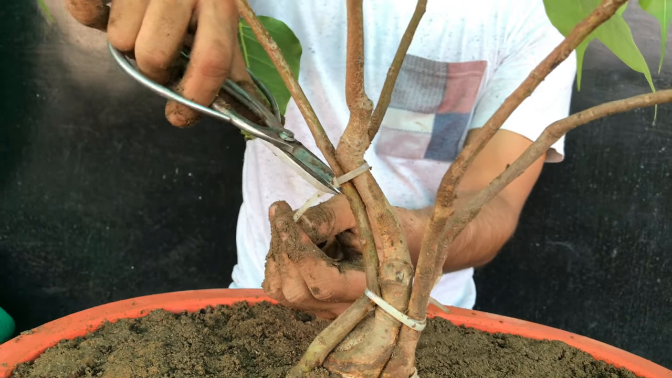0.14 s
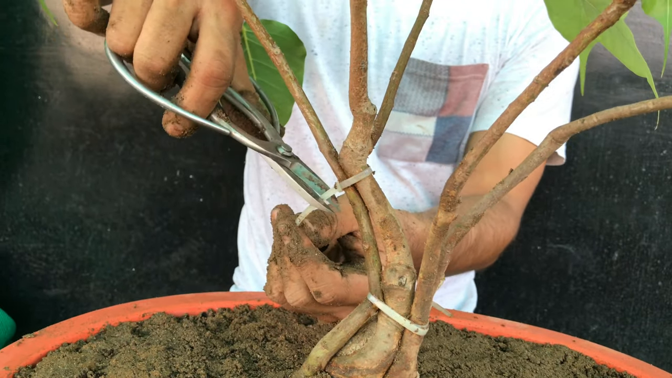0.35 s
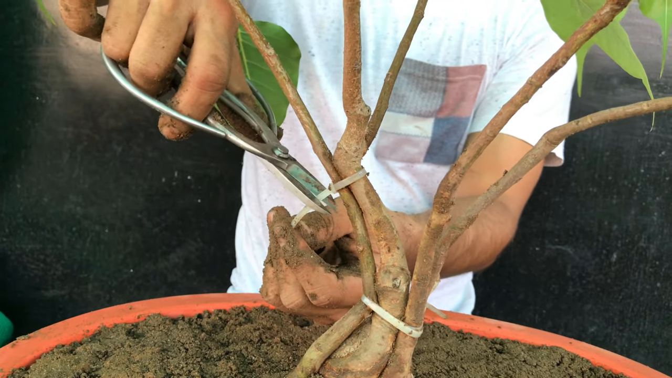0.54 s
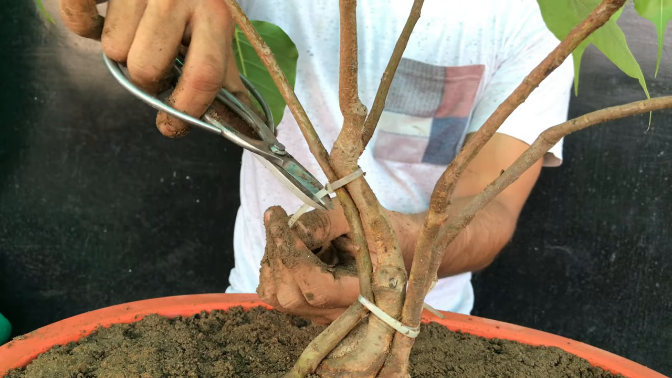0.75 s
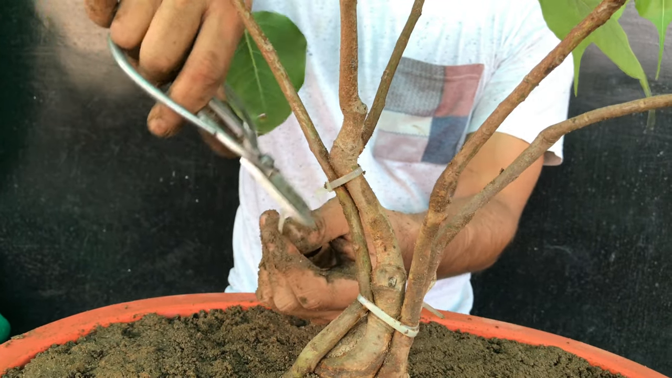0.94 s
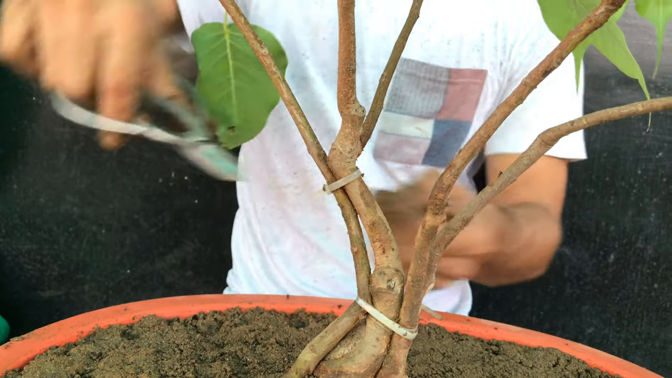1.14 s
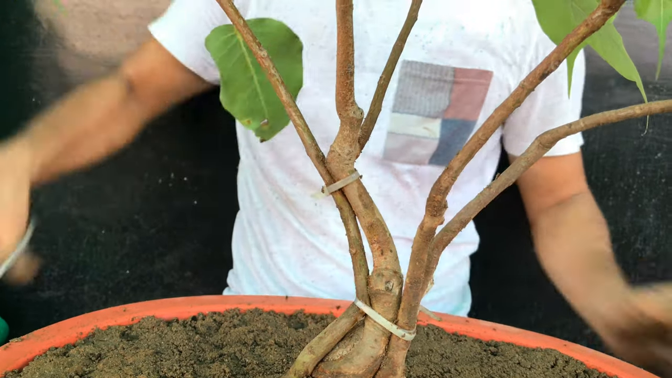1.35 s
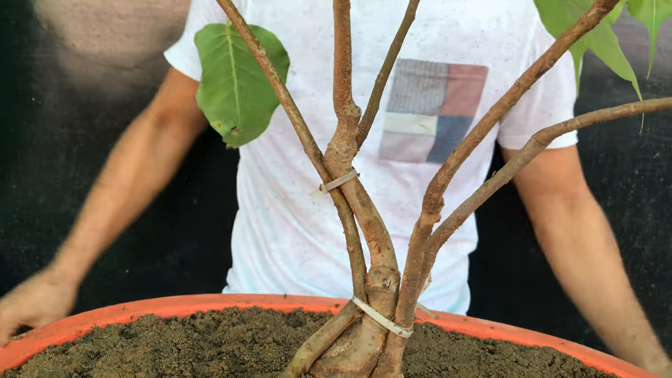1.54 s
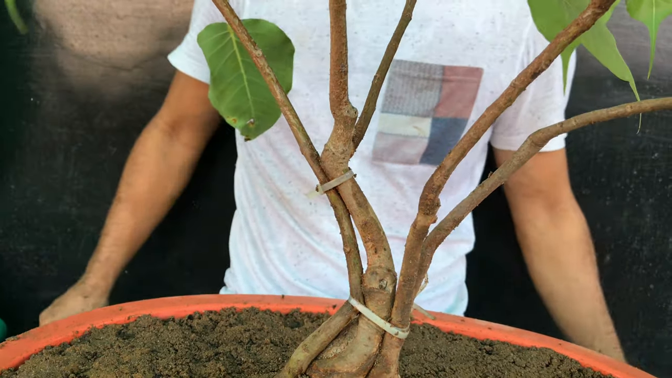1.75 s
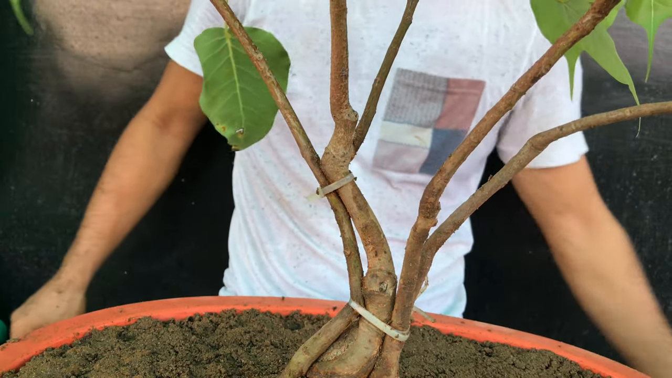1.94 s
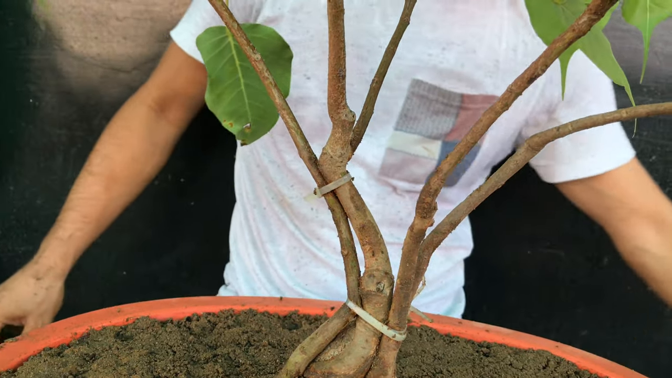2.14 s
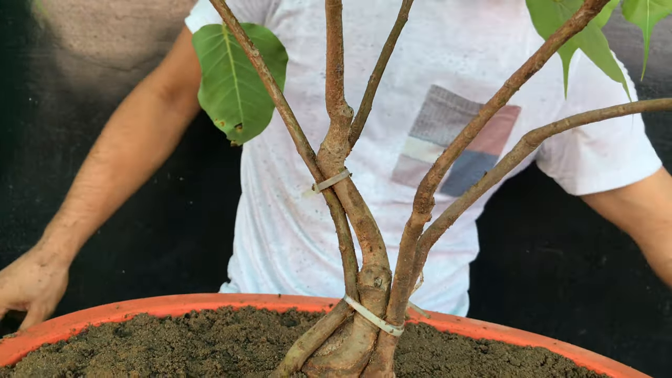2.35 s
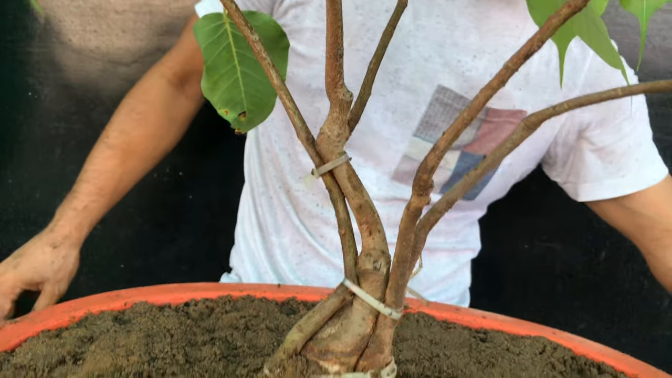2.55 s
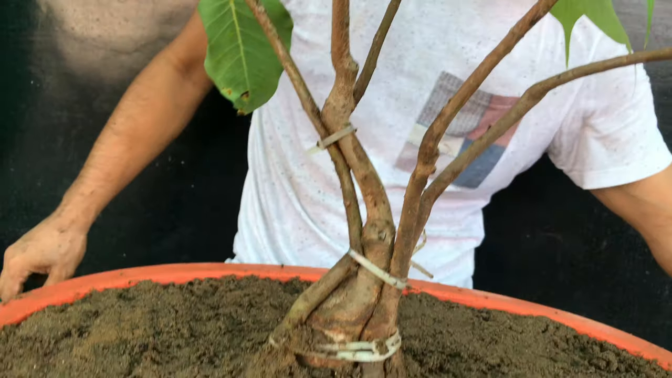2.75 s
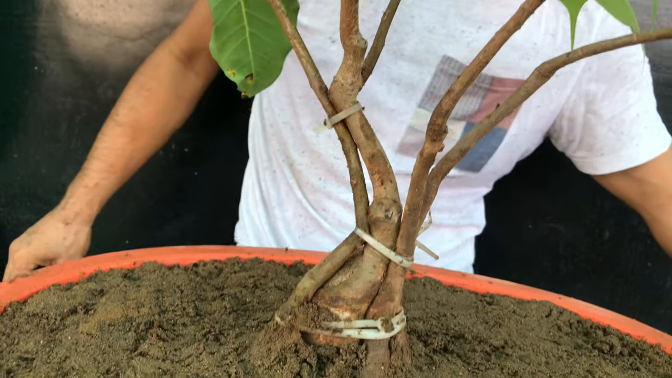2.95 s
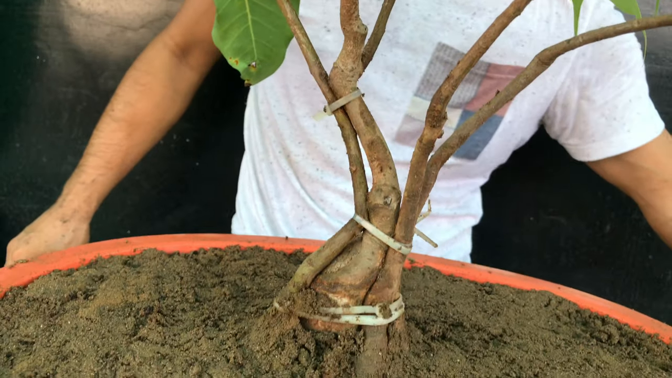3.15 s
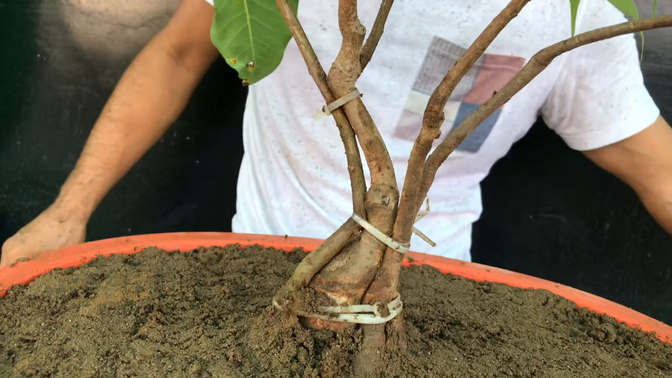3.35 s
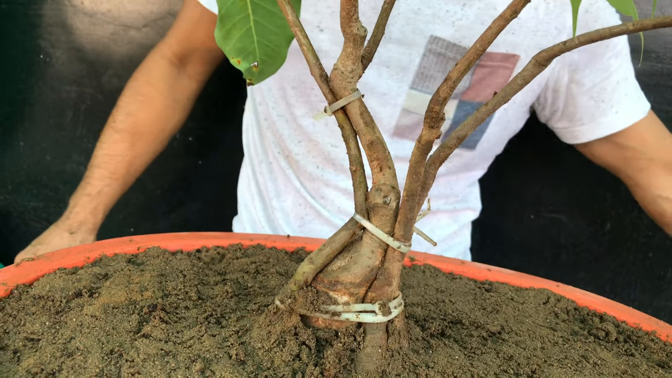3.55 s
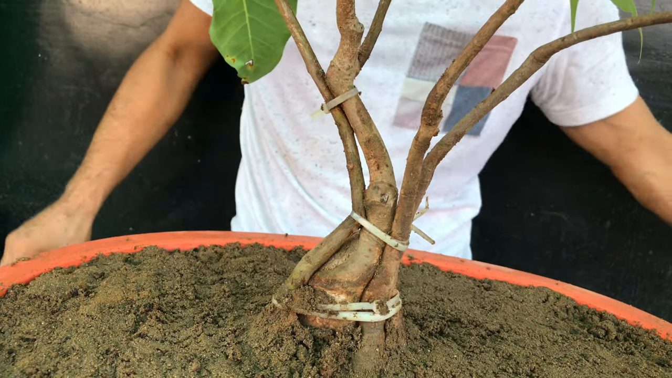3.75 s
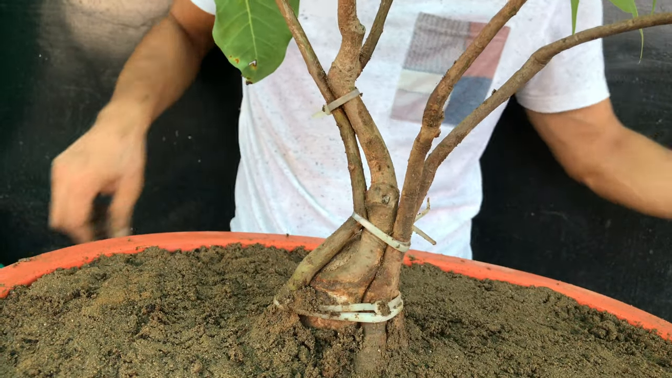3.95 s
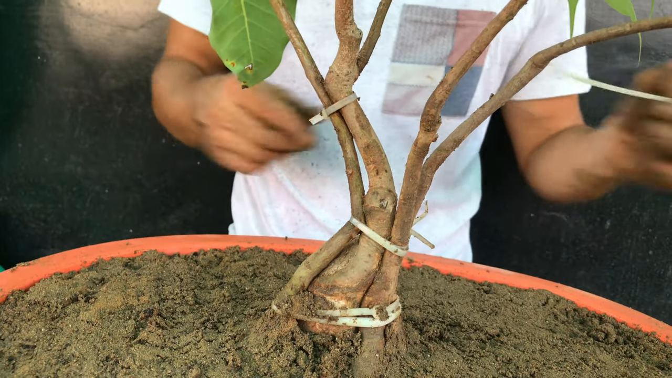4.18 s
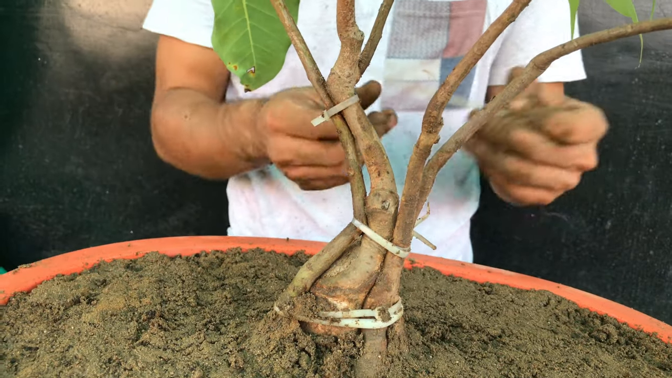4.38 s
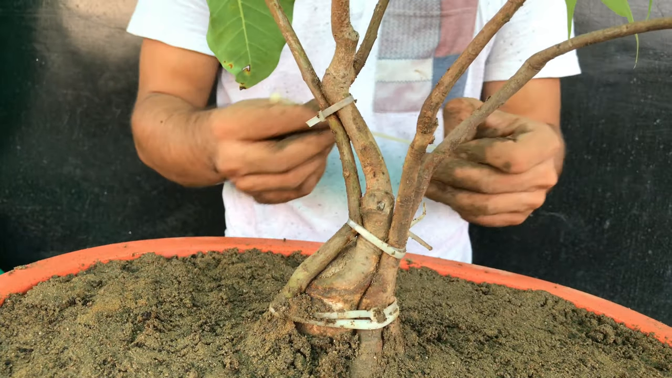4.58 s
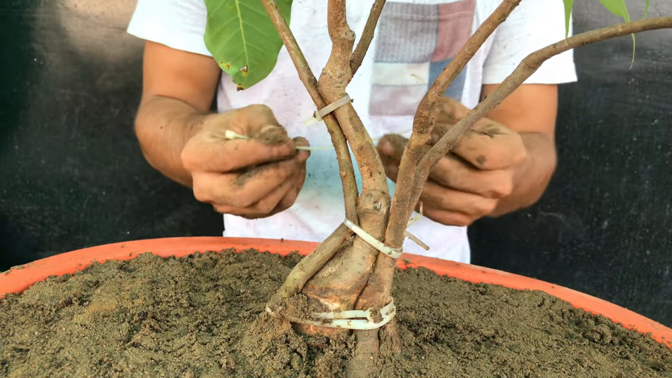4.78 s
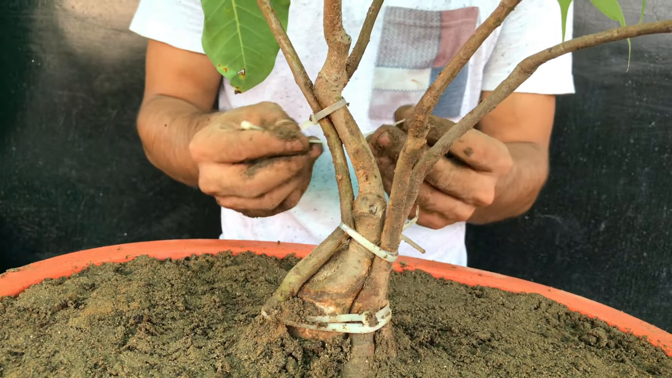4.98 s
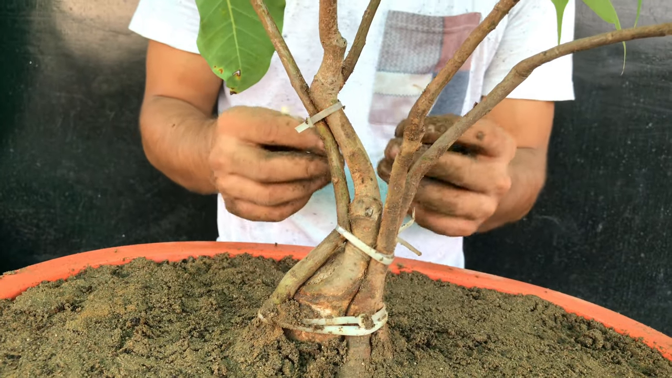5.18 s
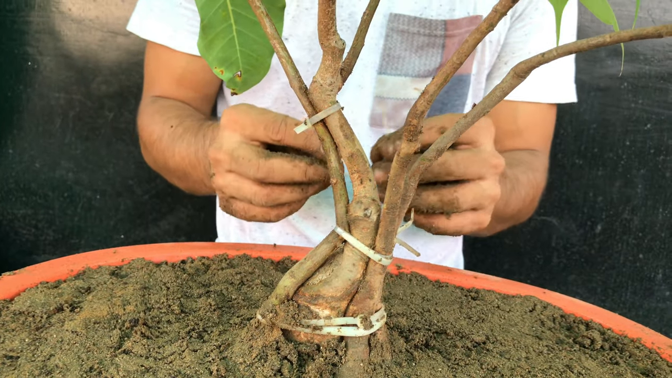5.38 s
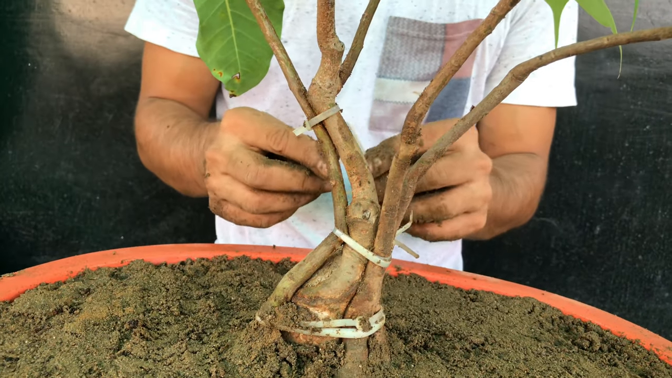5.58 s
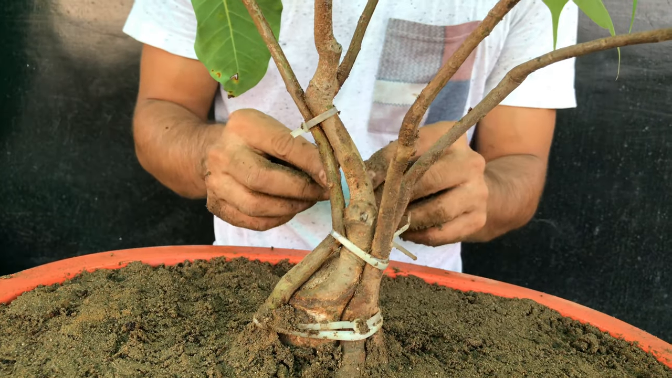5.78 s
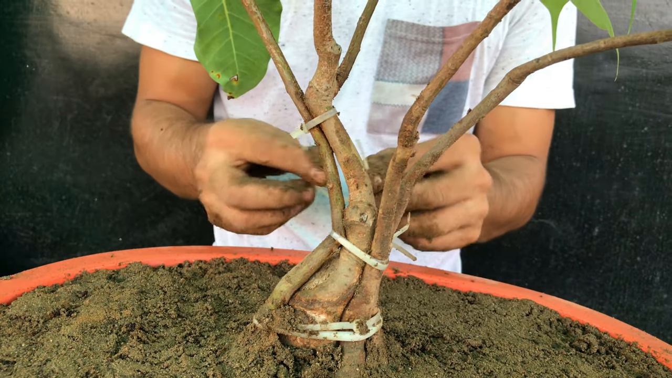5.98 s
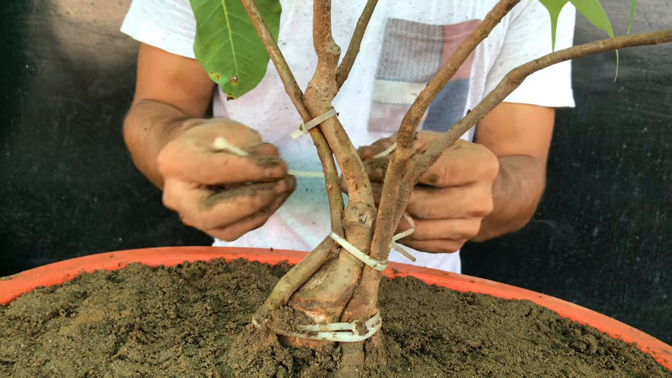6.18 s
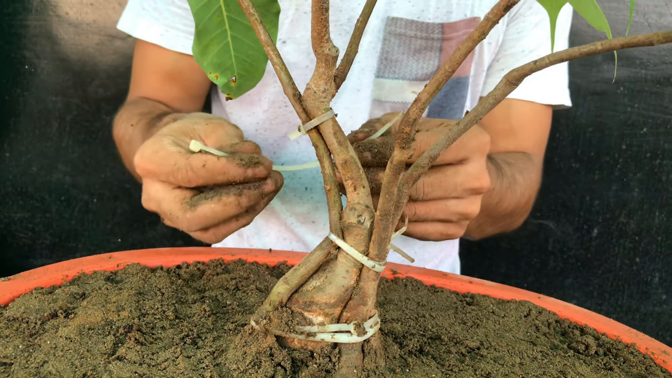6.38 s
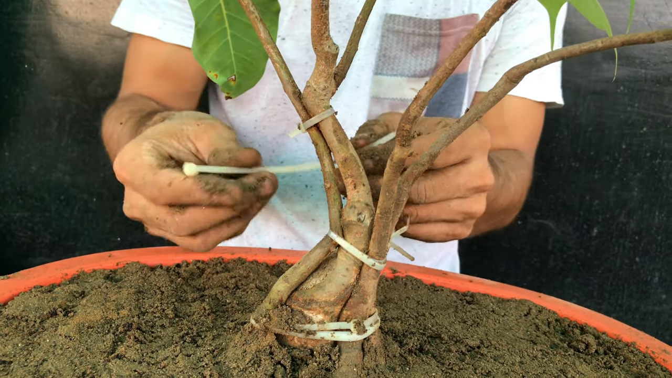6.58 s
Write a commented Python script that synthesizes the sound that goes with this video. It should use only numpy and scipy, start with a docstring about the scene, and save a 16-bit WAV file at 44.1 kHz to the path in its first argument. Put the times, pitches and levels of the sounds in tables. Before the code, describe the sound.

A quiet outdoor yard with constant low distant traffic, wavering engine hum and a barely audible high insect hiss. Faint brushes of cloth and hand come first. At about 0.87 s blades bite and creak, and at 0.89 s a very loud, dry plastic crack bursts out with bright steel ringing and a short tail. Tiny opening clicks follow near 1.1 s. From 1.74 to 1.87 s the scissors hit hard ground in a rapid, jingling clatter with dull thuds. Between 2.35 and 3.6 s a pot turns: irregular gritty ticks, scraping and fine soil grains, strongest near 2.7 s. A sharp click comes at 4.0 s, finger-sliding hiss at 4.45-4.8 s, and crisp ticks at 5.03 and 5.25 s. From 3.8 s onward small birds chirp, whistle and churr faintly, with blurred far horns and whines. Close, dry handling; distant, slightly echoing background.

```python
"""Small steel scissors snap through the tail of a cable tie on a potted tree outdoors, then drop on hard ground.
Coloured noise bursts make the cracks, bounces and thuds; blows on the steel also start decaying sine modes.
The pot turns with ringing gritty ticks and fine grains; fingers slide along a new tie as flickering hiss.
Far traffic is shaped noise under wavering engine tones; far horns, whines and insects are narrow noise or a sine.
Birds chirp, whistle and churr as gliding sines; further bird chatter is blurred into a noise band."""
import sys
import numpy as np
from scipy import signal
from scipy.fft import rfft, irfft
from scipy.io import wavfile
from scipy.ndimage import uniform_filter1d

SR = 44100
rng = np.random.default_rng(int(sys.argv[2]) if len(sys.argv) > 2 else 0)


def wav_record(signal):
    """Record a signal, one row per channel, as 16-bit PCM in the file named by sys.argv[1]."""
    frames = np.transpose(np.atleast_2d(signal))
    bounded = np.clip(frames, -1, 1)
    # unit amplitude maps onto the largest positive 16-bit level
    quanta = np.round(bounded * 32767).astype(np.int16)
    wavfile.write(sys.argv[1], SR, quanta)


N = 291942

# blade-opening clicks, then grit and plastic ticks, each with a faint scrape:
# t/s, ring peak/dB, centre f/Hz, treble peak/dB, scrape level/dB
TICKS = [(1.096, -46, 4000, -58, -80), (1.098, -49, 7000, -60, -85), (1.114, -52, 5400, -62, -85),
         (1.13, -53, 8800, -62, -85), (2.3612, -61, 7500, -60, -88), (2.4515, -56, 7500, -58, -76),
         (2.5094, -51, 5650, -56, -69), (2.591, -48, 7500, -63, -75), (2.6903, -41.5, 6500, -42, -69),
         (2.7197, -57, 6500, -47, -66), (2.744, -58, 9500, -51, -76), (2.8221, -47, 5400, -50, -69),
         (2.85, -58, 8000, -55, -85), (2.9025, -54, 5200, -55, -79), (2.9394, -52, 6000, -51, -79),
         (3.029, -46, 5300, -58, -81), (3.056, -62, 9000, -56, -84), (3.111, -56, 9500, -45, -68),
         (3.2494, -49, 4510, -54, -66), (3.2904, -49, 6960, -59, -74), (3.3493, -58, 9000, -52, -77),
         (3.4101, -53, 5000, -54, -69), (3.9905, -40.5, 4020, -41, -81), (3.998, -46, 3800, -49, -83),
         (4.4558, -54, 6500, -52, -80), (5.0338, -36, 4470, -44, -72), (5.255, -47, 6700, -44, -80)]
# spectrum of grit: f/Hz, relative level per Hz/dB
GRIT_SPECTRUM = [(7000, -18), (8500, -13), (11000, -10), (14000, -7), (15500, -6), (16500, -12)]


def undb(db):
    """Decibels to amplitude."""
    return 10 ** (np.asarray(db) / 20)


def unit(x):
    """Scale to rms 1."""
    return x / np.sqrt(np.mean(x ** 2))


def coloured(points):
    """Noise of rms 1 with the given spectrum, drawn straight in dB over log frequency."""
    hz, db = np.transpose(points)
    f = np.maximum(np.fft.rfftfreq(N, 1 / SR), 1)
    gain = undb(np.interp(np.log(f), np.log(hz), db))
    return unit(irfft(rfft(rng.standard_normal(N)) * gain, N))


def band(x, hz, width_hz):
    """A single resonance; fed with noise it leaves a soft-edged band."""
    b, a = signal.iirpeak(hz, hz / width_hz, fs=SR)
    return signal.lfilter(b, a, x)


def curve(rows):
    """Draw straight lines through a table of times and levels, one curve a column."""
    s, *columns = np.transpose(rows)
    return [np.interp(np.arange(N) / SR, s, column) for column in columns]


def walk(rate_hz):
    """Random levels held for 1 / rate and slewed twice; spread near 1."""
    hold = int(SR / rate_hz)
    steps = np.repeat(rng.standard_normal(N // hold + 1), hold)
    return 1.43 * uniform_filter1d(uniform_filter1d(steps, hold), hold)[:N]


def decay(s, db, t60, rise=.0002):
    """A quick rise and an exponential fall, as of a struck body."""
    out, t = np.zeros(N), np.arange(SR // 5) / SR
    out[int(s * SR):][:len(t)] = undb(db - 60 * t / t60) * (1 - np.exp(-t / rise))
    return out


def bump(s, length):
    """Progress 0-1 through an event and its smooth swell."""
    progress = np.clip((np.arange(N) / SR - s) / length, 0, 1)
    return progress, np.sqrt(np.abs(np.sin(np.pi * progress))) * (progress < 1)


def strokes(rows):
    """Swelling strokes from rows of t/s, length/s, level/dB."""
    return sum(undb(db) * bump(s, length)[1] for s, length, db in rows)


def tone(s, length, hz0, hz1, db, wander_hz, bend=1):
    """A gliding sine whose pitch also wanders; bend under 1 makes the glide start steeply."""
    progress, swell = bump(s, length)
    out, on = np.zeros(N), swell > 0
    hz = hz0 + (hz1 - hz0) * progress ** bend + wander_hz
    phase = 2 * np.pi * np.cumsum(hz[on]) / SR
    out[on] = undb(db) * np.sqrt(2) * swell[on] * np.sin(phase)
    return out


def steel(blows, crack, modes, rise, scatter_db):
    """Blows start modes that ring under the crack, unevenly each time; longer contact lets them rise slowly."""
    t, out = np.arange(SR // 4) / SR, crack.copy()
    rings = np.array([undb(db) * np.exp(-np.pi * width_hz * t) * np.sin(2 * np.pi * hz * t)
                      for hz, width_hz, db in modes])
    chances = rng.standard_normal((len(blows), len(modes)))
    for (s, db, *_), chance in zip(blows, chances):
        ring = undb(db + scatter_db * chance) @ rings
        out[int(s * SR):][:len(t)] += ring * (1 - np.exp(-t / rise))
    return out


def traffic():
    """Rumble and tyre roar swell on their own; engine tones waver through them in level and pitch."""
    # far road noise: f/Hz, relative level per Hz/dB
    spectrum = [(28, -43.5), (40, -7.5), (75, -5.5), (120, -7), (190, -10.5), (280, -17.5), (440, -30.5),
                (1300, -34.5), (2500, -41.5), (4500, -50), (5000, -52.5), (8000, -57.5), (12000, -62.5),
                (15000, -63), (15600, -58)]
    # traffic swell: t/s, rumble level/dB, tyre roar level/dB
    swell = [(0, -39.5, -53.5), (.9, -41.5, -54.5), (1.8, -42.5, -55), (2.6, -40, -54),
             (3.05, -40.5, -52.5), (3.4, -41, -54), (4.3, -40, -53), (5.1, -40, -54.5), (5.5, -39, -53.5),
             (6.62, -40.5, -55)]
    # an idling engine: t/s, firing tone level/dB, its octave level/dB
    idle = [(0, -54, -58), (.3, -43.5, -56), (1.7, -45, -49.5), (2.15, -39, -56.5), (2.5, -52, -48),
            (3.1, -41, -44.5), (4.3, -52, -46.5), (4.75, -43, -50), (5.2, -43, -40), (5.5, -44, -56),
            (5.85, -46.5, -44), (6.1, -37, -43.5), (6.35, -49, -48.5), (6.62, -32, -50)]
    # passing engines: t/s, length/s, start f/Hz, end f/Hz, level/dB
    drones = [(-.3, 1.01, 155.9, 161.9, -46), (1.15, 1.13, 197.6, 187.9, -50),
              (2.3, 0.61, 192, 186.1, -47.5), (2.75, .95, 182.9, 176.9, -43), (2.701, 0.8, 226.6, 224, -49),
              (3.55, 1.45, 228.6, 224.2, -54.5)]
    idle_hz = 69.87
    rumble_db, roar_db = curve(swell)
    far = coloured(spectrum)
    low = signal.sosfiltfilt(signal.butter(2, 400, fs=SR, output="sos"), far)
    out = unit(low) * undb(rumble_db) + unit(far - low) * undb(roar_db)
    for harmonic, db in enumerate(curve(idle), 1):
        level = undb(db + 2.7 * walk(8.8))
        hz = harmonic * idle_hz * (1 + .02004 * walk(12))
        out = out + level * np.sin(2 * np.pi * np.cumsum(hz) / SR)
    return out + sum(undb(2.7 * walk(8)) * tone(*row, 2.5 * walk(12)) for row in drones)


def insects():
    """A thin band of far chirring, twice filtered and gently uneven."""
    hz, width_hz, level_db = 9700, 1000, -79
    hiss = band(band(rng.standard_normal(N), hz, width_hz), hz, width_hz)
    return unit(hiss) * undb(level_db + 1.4 * walk(22))


def rubbing():
    """Cloth, pot, scrape and finger strokes: dense slips heard as hiss whose level flickers within milliseconds."""
    # cloth and pot brushing: t/s, length/s, level/dB
    rub = [(0, .065, -69), (.165, .12, -73), (.74, 0.11, -67.5), (1.08, .1, -72), (1.566, .04, -78),
           (2.35, 1.0, -70), (3.7, .06, -64)]
    # fingers sliding along the tie: t/s, length/s, level/dB
    slide = [(4.438, 0.046, -64.5), (4.489, .2, -58), (4.66, .13, -64.5)]
    # skin on the tie: f/Hz, relative level per Hz/dB
    skin_spectrum = [(4500, -14), (6300, -1), (8200, -17), (9500, -1), (11000, -4), (12300, -10),
                     (13300, -1), (14500, 4), (15500, -8), (16500, -4)]
    scrape_length_s, scrape_lead_s = .046, .02
    scrape_low_db, rub_low_db = -3.5, -6  # low band against the grit hiss
    slips = undb(1.7 * walk(150))
    high = coloured(GRIT_SPECTRUM)
    low = unit(band(rng.standard_normal(N), 4800, 3000))
    scrapes = strokes([(s - scrape_lead_s, scrape_length_s, db) for s, *_, db in TICKS])
    grit = scrapes * (high + undb(scrape_low_db) * low)
    grit = grit + strokes(rub) * (high + undb(rub_low_db) * low)
    return slips * (grit + coloured(skin_spectrum) * strokes(slide))


def far_calls():
    """Far horns, whines and blurred bird chatter as bands of noise, and one thin gliding tone."""
    # far horns, whines and blurred bird chatter: t/s, length/s, f/Hz, width/Hz, level/dB
    blurred = [(4.0, .66, 1530, 70, -65), (4.7, .3, 1540, 60, -66), (4.05, .4, 1260, 50, -66),
               (5.6, .24, 1455, 40, -65), (5.6, .22, 725, 40, -61), (3.8, 2.2, 3700, 1400, -68),
               (4.35, 1.0, 585, 50, -61), (5.3, 1.3, 520, 140, -61), (0, .95, 1230, 300, -65),
               (5.1, 1.0, 950, 500, -59.5), (5.25, .2, 1205, 40, -63)]
    noise = rng.standard_normal(N)
    bands = sum(undb(db) * bump(s, length)[1] * unit(band(band(noise, hz, width_hz), hz, width_hz))
                for s, length, hz, width_hz, db in blurred)
    whine = tone(s=3.93, length=.75, hz0=1505, hz1=1530, db=-64, wander_hz=14 * walk(25))
    return bands + whine


def snips():
    """Blades bite and creak through the plastic, then the tie parts in a burst of cracks as the steel rings."""
    # blade ring in the hand: f/Hz, width/Hz, level against the blow/dB
    blades = [(2630, 35, -36), (2736, 28, -42), (4070, 160, -24.5), (5800, 200, -24.5), (6106, 190, -12.5),
              (8000, 155, -11), (8460, 59, -30.5), (9950, 120, -17), (11100, 60, -35.5), (11606, 60, -17),
              (12300, 100, -23), (12470, 150, -22.5), (13400, 92.5, -29), (14700, 60, -30),
              (15100, 100, -16.5), (15550, 75, -21.5)]
    # crack of the plastic: f/Hz, relative level per Hz/dB
    snap_spectrum = [(300, -34), (600, -29.5), (1500, -23.5), (2600, -17), (3400, -20.5), (5000, -18),
                     (6100, -9.5), (6900, -16), (9100, -12), (11800, -5), (14000, -10), (15200, -4),
                     (16500, -1.5)]
    # pivot clicks as the blades open: t/s, peak/dB
    opening = [(1.092, -49), (1.131, -53)]
    bite_s, bite_db, creak_gap_s, creak_db = .8675, -40.5, .0063, -45
    snap_s, snap_db, crack_t60_s = .8901, -5, .011
    chatter_gap_s, chatter_stretch, chatter_db_per_s = .0012, 1.5, -2200
    blows = [(bite_s, bite_db)] + [(bite_s + k * creak_gap_s, creak_db) for k in (1, 2)]
    # after-cracks come ever slower and weaker
    late = np.cumsum(chatter_gap_s * chatter_stretch ** np.arange(5))
    blows += [(snap_s + s, snap_db + chatter_db_per_s * s) for s in (0, *late)]
    envelope = sum(decay(s, db, crack_t60_s) for s, db in blows + opening)
    # the freed blades and tie buzz on after the snap
    shiver = decay(snap_s, -20.5, t60=.15, rise=.003)
    crack = (envelope + shiver) * coloured(snap_spectrum)
    return steel(blows, crack, blades, rise=.0003, scatter_db=4)


def ticks():
    """Short clicks, each with its own ring and treble; fine grains of soil crackle while the pot turns."""
    tick_t60_s, treble_t60_s = .013, .0082
    ring_width = .3  # share of a tick's centre frequency
    turn_s, turn_length_s, grains_per_s = 2.35, 1.25, 32
    softest_grain_db, grain_t60_s = -61, .006
    noise, grit = rng.standard_normal(N), coloured(GRIT_SPECTRUM)
    when, size = rng.random((int(grains_per_s * turn_length_s), 2)).T
    # few grains are loud, most are soft
    grains = sum(decay(turn_s + turn_length_s * u, softest_grain_db - 2.5 * np.log(e), grain_t60_s)
                 for u, e in zip(when, size))
    treble = sum(decay(s, treble_db, treble_t60_s) for s, _, _, treble_db, _ in TICKS)
    rings = sum(band(decay(s, db, tick_t60_s) * noise, hz, ring_width * hz) for s, db, hz, *_ in TICKS)
    return (grains + treble) * grit + rings / np.sqrt(ring_width)


def drop():
    """Blades and handles bounce one after another, ringing unevenly; the ground thuds under the steel."""
    # scissors landing: t/s, peak/dB, thud peak/dB
    landings = [(1.7435, -35, -36), (1.7575, -31, -52), (1.7695, -32, -31.5), (1.7735, -33, -30.5),
                (1.778, -28, -34.5), (1.7835, -24.5, -47), (1.789, -28, -36.5), (1.794, -37, -36),
                (1.799, -35, -48), (1.806, -37, -37.5), (1.818, -44, -49), (1.827, -38, -40),
                (1.8365, -32, -36.5), (1.851, -48, -39.5), (1.862, -47, -50)]
    # handle ring when loose: f/Hz, width/Hz, level against the blow/dB
    handles = [(3640, 55, -16), (5390, 85, -8), (6900, 45, -12), (8350, 110, -8), (8750, 70, -12),
               (9450, 60, -14), (10300, 100, -13), (10950, 90, -10), (12350, 90, -8), (12630, 75, -5),
               (13070, 60, -5), (13880, 100, -7), (14830, 80, -7), (15010, 70, -5), (15170, 60, 2),
               (15330, 80, -5)]
    # rattle of the steel: f/Hz, relative level per Hz/dB
    rattle_spectrum = [(900, -40), (1500, -32), (3300, -23), (5300, -7.5), (7500, -11), (10000, -4.5),
                       (13000, -1), (15200, 1), (16500, -2)]
    # ground under the steel: f/Hz, relative level per Hz/dB
    thud_spectrum = [(150, 5.5), (330, -0.5), (520, 3), (750, -1.5), (1200, 1.5), (1600, -9.5), (2000, -3),
                     (2600, -9), (4000, -10.5)]
    rebound_gap_s, rebound_db = .005, -10
    rattle_db, knock_t60_s, thud_t60_s = -1, .03, .04
    # loose handles knock twice more after each landing
    gaps = rebound_gap_s * (1 + .14 * rng.standard_normal((len(landings), 2)))
    late = np.cumsum(gaps, axis=1)
    knocks = landings + [(s + late[i, k], db + (k + 1) * rebound_db, thud_db + (k + 1) * rebound_db)
                         for i, (s, db, thud_db) in enumerate(landings) for k in (0, 1)]
    rattle = sum(decay(s, db + rattle_db, knock_t60_s, rise=.0008) for s, db, _ in knocks)
    thud = sum(decay(s, db, thud_t60_s, rise=.00096) for s, _, db in knocks)
    ringing = steel(knocks, rattle * coloured(rattle_spectrum), handles, rise=.0013, scatter_db=3)
    return ringing + thud * coloured(thud_spectrum)


def birds():
    """Falling chirps, whistles with an overtone and hoarse churrs; deeper pitch flutter of the sine is hoarser."""
    # falling strokes: t/s, length/s, start f/Hz, end f/Hz, level/dB, bend (under 1 falls early, over 1 late)
    falls = [(3.865, .03, 4800, 3700, -66, 1), (3.89, .035, 5000, 4000, -66, .8),
             (3.91, .045, 4300, 3400, -65, .6), (4.105, .05, 4650, 3600, -63, 1),
             (4.132, .075, 4700, 3400, -61.5, .45), (4.13, .07, 5750, 5050, -70, .7),
             (4.16, .04, 5950, 5250, -70, .8), (4.69, .055, 4200, 3350, -67, .6),
             (4.715, .085, 4200, 3250, -65, .5), (4.7, .045, 5550, 5100, -70.5, 1),
             (4.965, .05, 4450, 3500, -63, 1.8), (5.003, .075, 4400, 3250, -63.5, .45),
             (4.99, .04, 5600, 5150, -71, 1), (5.045, .035, 5300, 4850, -71, 1),
             (5.32, .075, 4600, 3100, -63.5, 1.8), (5.39, .045, 3800, 2950, -65, 1),
             (5.36, .03, 5900, 5400, -74, 1), (5.885, .035, 4900, 4050, -65, 1),
             (5.62, .04, 5600, 5050, -72, 1)]
    # whistled notes: t/s, length/s, start f/Hz, end f/Hz, level/dB
    notes = [(3.775, .085, 3480, 3450, -59), (4.085, .04, 4620, 4580, -67), (4.33, .12, 3260, 3230, -67.5),
             (4.32, .05, 3580, 3540, -67), (4.385, .05, 3600, 3560, -66), (4.445, .035, 3700, 3450, -63),
             (4.49, .025, 3250, 3200, -67), (5.5, .03, 3700, 3550, -68), (5.555, .05, 3600, 3550, -67),
             (5.615, .035, 3750, 3500, -63), (5.66, .04, 3250, 3100, -66.5), (5.83, .035, 3800, 3450, -64),
             (5.85, .03, 3200, 3100, -66), (5.885, .045, 3650, 3500, -62), (6.56, .07, 3420, 3400, -60)]
    # hoarse churrs: t/s, length/s, level/dB
    churrs = [(3.86, .1, -63.5), (4.36, .08, -67), (5.55, .12, -65.5), (5.83, .11, -64.5)]
    clear_hz, hoarse_hz = 45, 450  # depth of the pitch flutter
    churr_hz, churr_sag, overtone_db = 4300, .95, -18
    flutter = walk(600)
    chirps = sum(tone(s, length, hz0, hz1, db, clear_hz * flutter, bend)
                 for s, length, hz0, hz1, db, bend in falls)
    whistles = sum(tone(s, length, k * hz0, k * hz1, db + relative_db, clear_hz / 2 * flutter)
                   for s, length, hz0, hz1, db in notes for k, relative_db in ((1, 0), (2, overtone_db)))
    hoarse = sum(tone(s, length, churr_hz, churr_sag * churr_hz, db, hoarse_hz * flutter)
                 for s, length, db in churrs)
    return (chirps + whistles + hoarse) * undb(2.2 * walk(130) - .5)


def yard(x, tail_db):
    """Walls and ground close by give a short diffuse tail of decaying noise."""
    t60_s = .175
    t = np.arange(SR // 3) / SR
    tail = rng.standard_normal(len(t)) * undb(-60 * t / t60_s) * (t > .004)
    tail = tail / np.sqrt(np.sum(tail ** 2))
    return x + undb(tail_db) * signal.fftconvolve(x, tail)[:N]


def scene():
    """Near handling and far callers in the yard, with rubbing, traffic and insects left dry."""
    near = yard(snips() + ticks() + drop(), tail_db=-10)
    # distant callers arrive with more echo
    far = yard(far_calls() + birds(), tail_db=-6)
    return (near + far + rubbing() + traffic() + insects())[None]


def record(dry):
    """Gain control ducks after loud peaks and recovers; the top is cut."""
    recovery_s, knee_db, top_hz = .12, -25.5, 15750
    keep = np.exp(-1 / (recovery_s * SR))
    power = signal.lfilter([1 - keep], [1, -keep], dry ** 2)
    # far above the knee, the gain halves the level's rise in dB
    gain = (1 + power / undb(knee_db) ** 2) ** -.25
    return signal.sosfilt(signal.ellip(10, .2, 70, top_hz, fs=SR, output="sos"), dry * gain)


dry = scene()
out = record(dry)
wav_record(out)
```